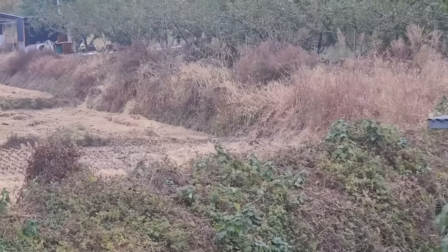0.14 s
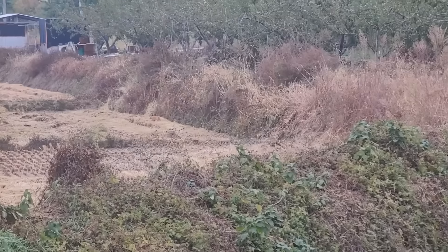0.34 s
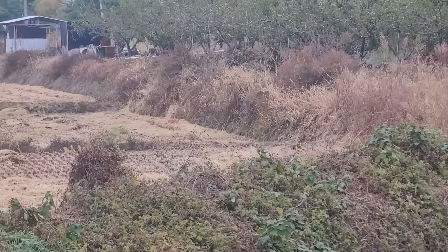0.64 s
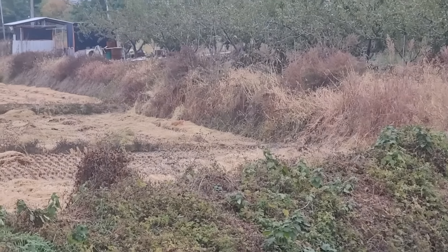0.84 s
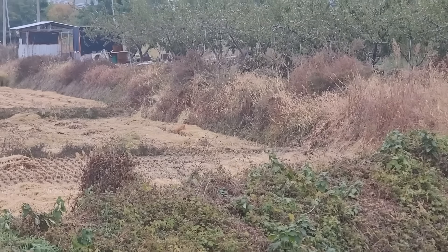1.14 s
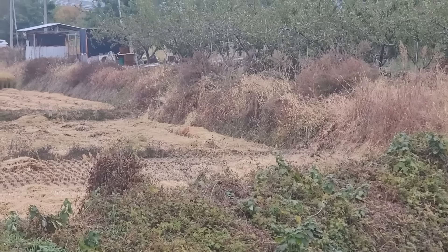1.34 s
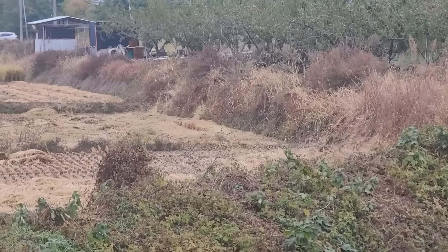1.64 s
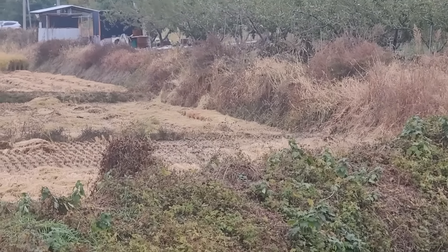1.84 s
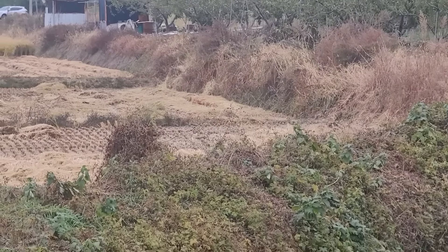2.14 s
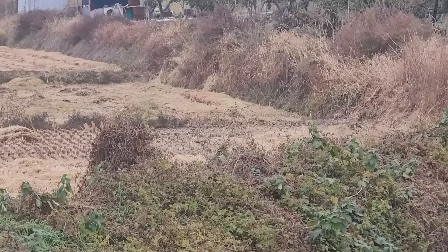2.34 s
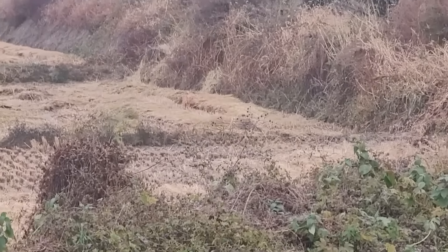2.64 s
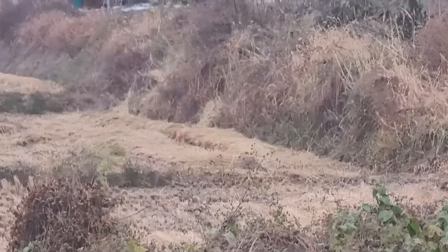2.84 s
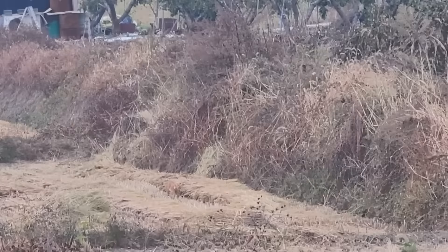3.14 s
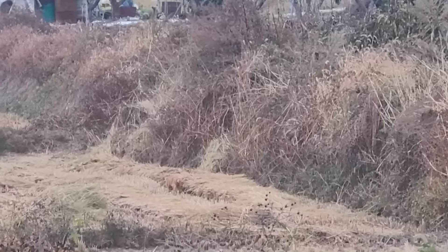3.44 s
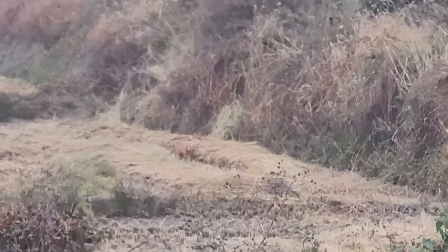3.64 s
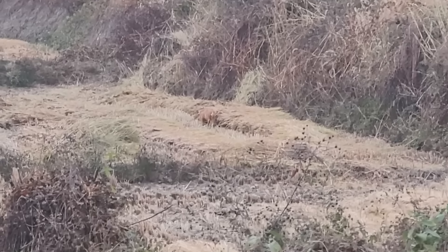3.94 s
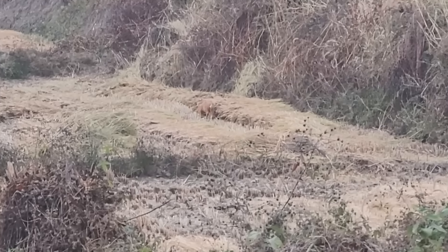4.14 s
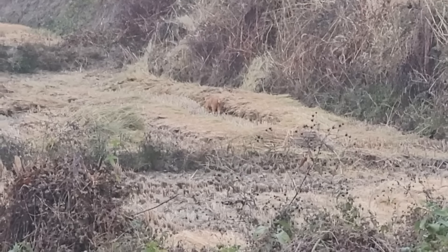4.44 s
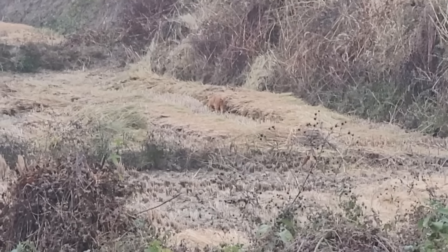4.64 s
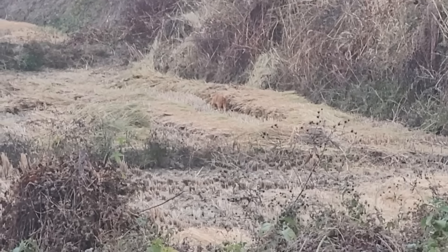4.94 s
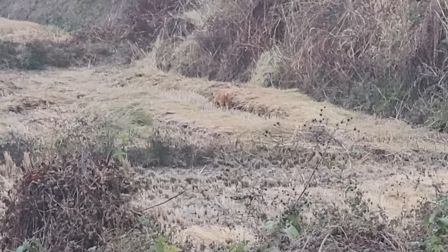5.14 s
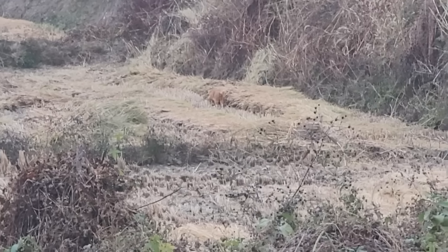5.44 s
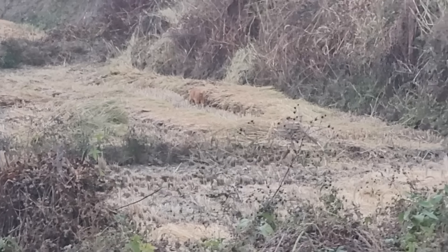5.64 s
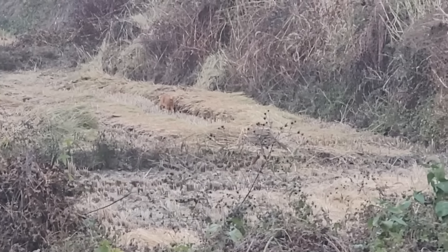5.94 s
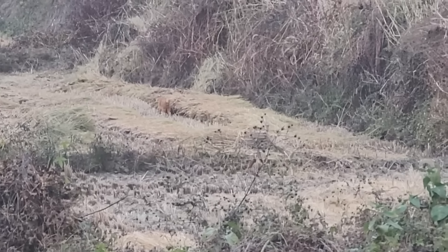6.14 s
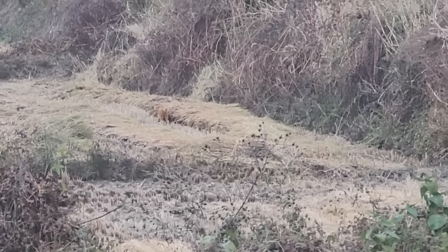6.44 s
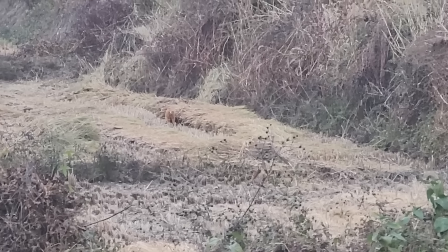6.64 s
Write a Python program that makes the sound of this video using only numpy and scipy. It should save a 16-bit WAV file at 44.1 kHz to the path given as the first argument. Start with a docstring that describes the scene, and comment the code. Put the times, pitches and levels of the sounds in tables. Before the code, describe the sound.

Quick, high dog yelps and hoarse barks repeat over a dry field, with sharp bird chirps, two dry rattles and rumbling wind.

```python
"""Across open farmland a small dog yelps in quick broken runs, then tires into single barks.
Small birds chirp, another scolds with two dry rattles, crickets trill, engines drone and wind rumbles.
Dog and birds are gliding oscillators with noise where the voice roughens; the rattles are damped resonances.
Crickets, engines and machines are wavering tones; air and handling ticks are shaped noise."""
import sys
import numpy as np
from scipy import signal
from scipy.fft import rfft, irfft, next_fast_len
from scipy.io import wavfile
from scipy.ndimage import uniform_filter1d, map_coordinates

SR = 44100
rng = np.random.default_rng(int(sys.argv[2]) if len(sys.argv) > 2 else 0)


def log_audio(samples):
    """Write samples as a 16-bit WAV file to the path given in sys.argv[1]."""
    # one column per channel
    frames = np.atleast_2d(samples).T
    # limit to full scale, then quantise
    limited = np.clip(frames, -1, 1)
    pcm = np.round(limited * 32767).astype(np.int16)
    wavfile.write(sys.argv[1], SR, pcm)


N = 298998


def amp(db):
    """Decibels to gain: 20 dB is a tenfold amplitude."""
    return 10 ** (np.asarray(db) / 20)


def unit(x):
    """Normalisation by effective value: x scaled to rms 1."""
    return x / np.sqrt(np.mean(x ** 2) + 1e-20)


def clock():
    """Sampled time: the time of every sample in seconds."""
    return np.arange(N) / SR


def along(points, hz):
    """Interpolation of (Hz, value) points on a logarithmic frequency axis."""
    point_hz, value = np.transpose(points)
    return np.interp(np.log(hz + 1), np.log(point_hz + 1), value)


def curves(rows):
    """Linear interpolation in time: one value per sample for each column after the time."""
    time_s, *columns = np.transpose(rows)
    return [np.interp(clock(), time_s, column) for column in columns]


def wobble(rate):
    """Band-limited fluctuation: a smooth curve through random knots, rate of them a second."""
    knots = rng.standard_normal(int(N * rate / SR) + 4)
    return map_coordinates(knots, [clock() * rate])


def gate(t, start, end, rise, fall):
    """Amplitude envelope: quarter-sine edges open at start and close at end."""
    opening = np.sin(np.pi / 2 * np.clip((t - start) / rise, 0, 1))
    closing = np.sin(np.pi / 2 * np.clip((end - t) / fall, 0, 1))
    return opening * closing


def swells(rows):
    """Superposition of bell-shaped gains, each row (time_s, level_db, half_length_s)."""
    return sum(amp(db) * np.exp(-.5 * ((clock() - s) / half) ** 2) for s, db, half in rows)


def filtered(x, response):
    """Linear filtering: the spectrum of x times a response of frequency, real or complex."""
    size = next_fast_len(N + SR // 2)
    return irfft(rfft(x, size) * response(np.fft.rfftfreq(size, 1 / SR)), size)[..., :N]


def syllables():
    """Vocal-fold tension sets pitch: barks climb in an S, yelps and whines glide along an arch."""
    # Rising barks: start_s, end_s, fundamental_db, overtones_db, first_hz, last_hz, roughness (0-1)
    barks = [(.072, 0.138, -36.5, -43, 334.4, 611, 0.57), (.433, 0.488, -38, -42, 443.4, 529, 0.48),
             (0.833, .894, -39.5, -41.5, 433.5, 560, 0.76), (1.253, 1.307, -36, -38.5, 472, 556, 0.65),
             (1.704, 1.773, -32, -40.5, 516.5, 595, 0.17), (2.102, 2.177, -36.5, -42, 419, 594, 0.7),
             (2.232, 2.28, -34, -55, 495, 626, 1), (2.348, 2.412, -38.5, -42, 341.3, 553, 0.61),
             (2.607, 2.676, -31, -39.5, 516, 611, 0.34), (3.026, 3.091, -32, -40.5, 460, 633, 0.48),
             (3.377, 3.441, -34, -41, 421.3, 584, 0.34), (3.778, 3.833, -31, -40, 512.5, 585, 0.41),
             (4.144, 4.211, -38.5, -40.5, 346, 560, 0.4), (4.508, 4.559, -37, -45, 367, 584, 0.3),
             (4.853, 4.899, -43.5, -47.5, 383, 554, .5), (5.157, 5.217, -40.5, -46, 309.5, 528, 0.33),
             (5.405, 5.468, -39.5, -41.5, 442.6, 512.4, 0.24), (5.725, 5.783, -40.5, -46, 292, 548, 0.24),
             (6.026, 6.08, -42, -48.5, 291.4, 578, 0.26), (6.316, 6.364, -43.5, -48, 299, 579, 0.2),
             (6.587, 6.65, -40, -45, 305, 531, 0.26)]
    # Clear open-mouthed yelps: start_s, end_s, fundamental_db, overtones_db, pitch_hz, glide_hz
    yelps = [(.494, 0.546, -36, -43.5, 568, 35), (.537, 0.634, -43.5, -52.5, 590, -92),
             (0.896, 0.949, -37, -42, 601, -72), (0.958, 1.009, -39.5, -41.5, 577, 63),
             (1.309, 1.359, -27.5, -41, 632, 73), (1.365, 1.411, -26, -42.5, 605, 33),
             (1.419, 1.476, -26, -44, 648.4, 28.5), (1.477, 1.52, -25, -41, 601, 75),
             (1.777, 1.837, -29, -42, 604.4, -14), (2.183, 2.233, -32, -39.5, 579, -46),
             (2.275, 2.35, -36.5, -46.5, 603, -96), (2.681, 2.752, -35, -41, 578, -53),
             (2.751, 2.81, -36, -42, 553, 83), (3.446, 3.503, -35.5, -52, 606, 5),
             (3.524, 3.593, -34, -47.5, 593, 134), (3.841, 3.881, -31, -46, 602, -9),
             (4.209, 4.308, -44, -51.5, 540.4, -46)]
    # Whines that trail off as the mouth closes: start_s, end_s, fundamental_db, pitch_hz, glide_hz
    whines = [(0.142, .196, -44, 692, 50), (1.514, 1.555, -32.5, 684, 67), (1.822, 1.876, -34, 686, 50),
              (3.087, 3.146, -37, 650, -62), (3.493, 3.528, -33.5, 644, -74),
              (3.873, 3.947, -36, 607.5, 32), (4.553, 4.616, -41.5, 682, 2), (4.891, 4.951, -44.5, 736, 75),
              (5.212, 5.245, -52, 630, 66), (5.469, 5.522, -47, 650, 47), (5.773, 5.823, -45, 663, -37),
              (6.071, 6.109, -48.5, 657, 0)]
    climb_centre, climb_width = .47, 0.1434  # shares of the bark's length
    arch_sag = 0.041  # share by which the pitch sinks at both ends
    yelp_rough, whine_rough = 0.18, 0.17  # 0-1
    u = np.linspace(0, 1, num=20)
    climb = 1 / (1 + np.exp((climb_centre - u) / climb_width))

    def arch(hz, glide):
        """Tension easing at both ends bends a straight glide into an arch."""
        return (hz + glide * (u - .5)) * (1 - arch_sag * (2 * u - 1) ** 2)

    for start, end, db, overtones_db, first, last, rough in barks:
        yield start, end, db, overtones_db, rough, first + (last - first) * climb
    for start, end, db, overtones_db, hz, glide in yelps:
        yield start, end, db, overtones_db, yelp_rough, arch(hz, glide)
    for start, end, db, hz, glide in whines:
        yield start, end, db, db - 17, whine_rough, arch(hz, glide)


def dog():
    """Source-filter voice: gliding harmonics take the throat's colour; rough noise pulses with the folds."""
    # Overtone colour of the throat, on top of a fall with harmonic order: frequency_hz, level_db
    throat = [(300, 21), (650, 2.5), (1050, 2.5), (1350, -13.5), (1600, 2), (1820, -0.5), (2000, -12.5),
              (2300, -63), (3500, -45)]
    # Relative spectrum of the rough noise: frequency_hz, density_db (per Hz)
    growl_colour = [(180, -25), (400, -16), (550, 3), (720, 3.5), (1050, -5.5), (1350, -13), (1750, -4.5),
                    (2100, -41), (3500, -41.5)]
    # Strength of the fundamental as pitch moves within a syllable: pitch_hz, relative_db
    mouth = [(320, 1), (420, -11), (600, -3)]
    onset_rough, onset_s = 1, 0.0039  # extra roughness while the folds start up, and its decay time
    out, now = np.zeros(N), clock()
    jitter, shimmer = wobble(260), wobble(110)
    growl = unit(filtered(rng.standard_normal(N), lambda hz: amp(along(growl_colour, hz))))
    orders = np.arange(2, 7)[:, None]
    for start, end, low_db, high_db, rough, pitches in syllables():
        on = (now >= start) & (now < end)
        t = now[on]
        scoop = 1 - 0.12 * np.exp(-(t - start) / 0.0029)  # the folds take a moment to reach their tension
        contour = np.interp(t, np.linspace(start, end, len(pitches)), pitches)
        hz = contour * scoop * (1 + 0.067 * rough * jitter[on])
        phase = 2 * np.pi * np.cumsum(hz) / SR
        strengths = amp(along(throat, orders * hz) - 3.4 * orders)
        overtones = unit(np.sum(strengths * np.sin(orders * phase), axis=0))
        fundamental = unit(amp(along(mouth, hz)) * np.sin(phase))
        voice = amp(low_db) * fundamental + amp(high_db + 1) * overtones
        roughness = 0.83 * rough + onset_rough * np.exp(-(t - start) / onset_s)
        fluttering = unit(growl[on] * (1 + 0.35 * np.cos(phase)))
        rasp = roughness * np.std(voice) * fluttering
        push = gate(t, start, end, rise=0.014 + 0.014 * rough, fall=0.016)  # rough barks build up more slowly
        out[on] += (voice + rasp) * unit(push * amp(1.8 * shimmer[on]))
    return amp(0.06) * out


def whistles():
    """Frequency modulation of a whistle: slurs hook up and sink, arches leap up, hold and drop."""
    # Down-slurred chirps: start_s, end_s, top_hz, bottom_hz, fall_s, closing_turn_hz, level_db,
    # hook_db (extra level on the opening hook)
    slurs = [(0.084, 0.151, 5870, 3040, 0.037, 0, -41, -1),
             (0.275, 0.393, 6600, 3520, 0.024, 334, -43.5, -8.5),
             (0.765, 0.882, 6200, 3855, 0.022, 230, -54.5, -12),
             (0.958, 1.04, 6300, 3440, 0.02, 2, -54, -20),
             (1.328, 1.423, 6600, 3500, 0.025, 343, -39.5, -3.5),
             (4.349, 4.423, 6440, 3020, 0.036, 8, -40, -7), (4.63, 4.697, 6510, 3010, 0.031, -5, -40, -7.5),
             (6.568, 6.613, 6550, 3580, 0.026, 3, -39.5, 1), (6.662, 6.772, 6020, 2860, 0.045, 0, -40, -20)]
    # Arched chirps: start_s, end_s, top_hz, glide_hz, level_db, legs_db (extra on rising and falling legs)
    arches = [(1.129, 1.244, 7200, -650, -42.5, -23), (1.731, 1.768, 6040, 695, -50, 2),
              (1.749, 1.788, 6480, 0, -48, -8), (4.202, 4.274, 7540, 0, -52.5, 15),
              (4.493, 4.57, 7720, 198, -59.5, 17), (6.38, 6.42, 7470, 0, -45.5, 13.5),
              (6.514, 6.544, 6400, 0, -38, -8)]
    hook_s, hook_rise_s, fall_shape = 0.0089, .014, 1.4  # time of the top, rise towards it, fall exponent
    turn_s, turn_width_s = .087, 0.01395  # time of the closing turn, and its half-length
    break_s, break_width_s = .029, 0.0035  # when the hook gives way to the slur, and how gradually
    hold_s, fade_db_per_s = 0.036, 152  # a slur holds its level, then fades
    arch_drop_hz, arch_rise_s, arch_fall_s = 2716, .0075, .004  # depth of an arch's feet, leg times
    for start, end, top, bottom, fall_s, turn_hz, db, hook_db in slurs:
        t = np.arange(0, end - start, 1 / SR)
        leg_s = np.where(t < hook_s, hook_rise_s, fall_s)
        height = np.exp(-np.abs((t - hook_s) / leg_s) ** fall_shape)
        turn = turn_hz * np.exp(-((t - turn_s) / turn_width_s) ** 2)
        shape_db = hook_db / (1 + np.exp((t - break_s) / break_width_s))
        fade_db = fade_db_per_s * np.maximum(t - hold_s, 0)
        yield start + t, bottom + (top - bottom) * height + turn, db + shape_db - fade_db
    for start, end, top, glide, db, legs_db in arches:
        t = np.arange(0, end - start, 1 / SR)
        feet = np.exp(-t / arch_rise_s) + np.exp((t - t[-1]) / arch_fall_s)
        hz = top + glide * (t / t[-1] - .5) - arch_drop_hz * feet
        yield start + t, hz, db + legs_db * feet


def chirps():
    """Near-sinusoidal whistling: thin tones quaver in pitch and level, with added husky bursts of noise."""
    # Where a bird's voice breaks into a rasp: time_s, level_db, half_length_s
    husks = [(.64, -63.5, 0.038), (1.748, -51.5, 0.0077), (6.378, -47.5, 0.0086), (6.53, -49, 0.015),
             (6.562, -48.5, 0.01)]
    # Relative spectrum of the rasp: frequency_hz, density_db (per Hz)
    husk_colour = [(2500, -26), (3900, -7.5), (4900, -11), (6000, -4), (7300, -7.5), (8600, -29.5)]
    out, now = np.zeros(N), clock()
    quaver, flutter = wobble(600), wobble(250)
    for s, hz, db in whistles():
        on = (now >= s[0]) & (now < s[-1])
        t = now[on]
        pitch = np.interp(t, s, hz) * (1 + 0.009 * quaver[on])
        phase = 2 * np.pi * np.cumsum(pitch) / SR
        envelope = gate(t, t[0], t[-1], rise=.004, fall=.004)
        level = amp(np.interp(t, s, db) + 2.4 * flutter[on]) * envelope
        out[on] += level * np.sin(phase)
    husk = unit(filtered(rng.standard_normal(N), lambda hz: amp(along(husk_colour, hz))))
    return amp(0.5) * out + swells(husks) * husk * amp(2.6 * flutter)


def rattle(levels, resonances, click_hz, scatter):
    """Damped resonance: each click rings the bird's throat at slightly new pitches and strengths."""
    cycles = np.cumsum(click_hz * (1 + 0.01777 * wobble(30))) / SR
    click = cycles.astype(int)
    since = cycles % 1 / click_hz  # seconds since the click
    ring = np.zeros(N)
    for hz, width, db in resonances:
        detune, strength = rng.standard_normal((SR, 2))[click].T
        strokes = np.exp(-width * since) * (1 - np.exp(-since / 0.0017))
        gain = amp(db + 1.7 * strength + 4.7 * wobble(900))  # the fast wobble makes the rasp
        ring += gain * strokes * np.sin(2 * np.pi * hz * (1 + scatter * detune) * since)
    ring = filtered(ring, lambda hz: 1 / (1 + (hz / 4100) ** 12))
    envelope = gate(clock(), levels[0][0], levels[-1][0], rise=0.029, fall=.015)
    return unit(ring) * amp(curves(levels)[0]) * envelope


def crickets():
    """Amplitude modulation by wing strokes pulses faint trills; random phase drift makes them fuzzy."""
    # Trills: start_s, end_s, pitch_hz, level_db
    trills = [(1.448, 1.748, 5700, -79), (2.377, 2.7, 6380, -78), (2.99, 4.151, 5910, -75),
              (3.68, 4.124, 6350, -73), (4.738, 5.3, 5890, -69.5), (5.186, 5.565, 6350, -71)]
    t = clock()
    strokes = amp(1.8 * wobble(25)) * (1 + .5 * np.sin(2 * np.pi * 55 * t))
    drift = 2 * np.pi * np.cumsum(50 * wobble(300)) / SR
    out = np.zeros(N)
    for start, end, hz, db in trills:
        envelope = gate(t, start, end, rise=0.075, fall=.06)
        out += amp(db) * envelope * np.sin(2 * np.pi * hz * t + drift)
    return strokes * out


def engines():
    """Periodic firing: only the lowest orders carry; a throbbing drone recedes while another speeds up."""
    # Firing rate of the throbbing engine: time_s, firing_hz
    revs = [(0, 74.5), (.85, 84), (1.25, 65.5), (2.3, 64), (3.3, 72.5), (4.2, 77), (4.55, 66), (5.1, 68),
            (5.5, 79.5), (6.78, 82)]
    # Loudness of the throbbing engine: time_s, level_db
    drone = [(0, -42), (.7, -47.5), (1.66, -40.5), (2.5, -40), (4.3, -47), (4.7, -50), (5.2, -63.5),
             (6.78, -62)]
    # Second engine: time_s, firing_hz, level_db
    second_engine = [(3.3, 119.5, -80), (3.6, 127.7, -52), (3.9, 139, -56.5), (4.5, 146.7, -60.5),
                     (5.4, 156.8, -64.5), (6.78, 168.5, -74)]
    beat_hz, beat_depth, trough_s = 2.27, 0.18, 2.783  # throb rate, depth (0-1), time of one trough
    phase = 2 * np.pi * np.cumsum(curves(revs)[0] * (1 + 0.0046 * wobble(12))) / SR
    throb = 1 - beat_depth * np.cos(2 * np.pi * beat_hz * (clock() - trough_s))
    firing = unit(np.sin(phase) + amp(-21) * np.sin(2 * phase))
    first = throb * amp(curves(drone)[0] + 2.9 * wobble(6.4)) * firing
    hz, db = curves(second_engine)
    second = amp(db + 2 * wobble(6)) * unit(np.sin(2 * np.pi * np.cumsum(hz) / SR))
    return first + second


def machines():
    """Propagation through moving air: far steady tones waver in pitch and level as they come and go."""
    # Machine tones: start_s, end_s, pitch_hz, level_db
    hums = [(-.3, 7.6, 120, -62), (-.3, 1.34, 385.3, -55), (1.4, 4.77, 382.7, -58.5),
            (3.25, 6.9, 385.1, -55), (2.25, 3.5, 312.4, -54.5), (5.3, 7, 308, -56),
            (5.7, 6.9, 269.2, -60.5)]
    out = np.zeros(N)
    for start, end, hz, db in hums:
        level = amp(db + 1.94 * wobble(11.0)) * gate(clock(), start, end, rise=0.07, fall=0.08)
        out += level * unit(np.sin(2 * np.pi * np.cumsum(hz + 2.52 * wobble(20)) / SR))
    return out


def rush(spectrum, alike, patchy_db):
    """Partly coherent noise: a stereo pair of rms 1, with random gain patches in time and frequency."""
    z = signal.stft(rng.standard_normal((2, N)), nperseg=512)[2]
    patches = uniform_filter1d(rng.standard_normal(z.shape[1:]), size=6, axis=0)
    patches = unit(uniform_filter1d(patches, size=14, axis=1))
    pair = signal.istft(z * amp(patchy_db * patches), nperseg=512)[1][:, :N]

    def mid_side(hz):
        """Coherence: the balance of mid and side sets the left-right likeness."""
        turn = np.arccos(np.clip(along(alike, hz), -1, 1)) / 2
        return amp(along(spectrum, hz)) * np.array([np.cos(turn), np.sin(turn)])

    mid, side = filtered(pair, mid_side)
    return unit(np.array([mid + side, mid - side]))


def air():
    """Broadband turbulence noise: low wind with buffets, a countryside wash and a fine, flickering hiss."""
    # Wind rumble: time_s, level_db
    wind_levels = [(0, -51), (2.8, -43.5), (3.5, -42), (4.5, -46.5), (5.3, -38.5), (5.7, -43),
                   (6.78, -38.5)]
    # Wind buffets on the microphone: time_s, level_db, half_length_s
    buffets = [(3.333, -32.5, 0.052), (4.739, -33.5, 0.019), (5.111, -25, 0.014), (5.42, -37, 0.035),
               (6.46, -38.5, 0.022)]
    # Relative spectra of wind, countryside and hiss: frequency_hz, density_db (per Hz)
    rumble = [(15, -14.5), (60, 1.5), (100, -7), (200, -40.5), (350, -65)]
    country_colour = [(100, -6.5), (200, -2.5), (520, -5.5), (900, -6), (1700, -12), (2200, -25.5),
                      (4500, -31), (6200, -28), (9000, -42)]
    hiss = [(2000, 5), (4000, -7), (6500, 2.5), (8500, -13), (12500, -1), (15500, -2)]
    # Left-right likeness of the wind, then of countryside and hiss: frequency_hz, likeness (0-1)
    wind_alike = [(30, 0.45), (100, 0.78)]
    alike = [(30, 1), (100, 0.81), (300, 0.97), (640, 0.39), (1400, 0.12), (3000, 0.025), (15000, 0)]
    # Course of the fine hiss, before an 8.5 dB lift: time_s, level_db
    fizz_levels = [(0, -74.5), (.8, -79.5), (1.18, -69.5), (1.28, -65), (1.41, -62.5), (1.46, -94),
                   (1.68, -70.5), (1.85, -75.5), (2.95, -72.5), (3.68, -65), (3.91, -72.5), (4.55, -65.5),
                   (4.8, -72.5), (6.1, -73), (6.78, -69)]
    flicker_hz, flicker_depth_db = 17, 2.5
    wind_gain = np.hypot(amp(curves(wind_levels)[0]), swells(buffets))  # powers add
    wind = wind_gain * rush(rumble, wind_alike, patchy_db=0.5)
    country = amp(-49.5) * rush(country_colour, alike, patchy_db=1.5)
    flicker_phase = 2 * np.pi * np.cumsum(flicker_hz * (1 + .25 * wobble(9))) / SR
    flicker_db = flicker_depth_db * np.sin(flicker_phase)
    fizz_gain = amp(curves(fizz_levels)[0] + 8.5 + flicker_db + 1.3 * wobble(700))
    fizz = fizz_gain * rush(hiss, alike, patchy_db=3.5)
    return wind + country + fizz


def ticks():
    """Impulsive contact: each handling tick is a band of noise that dies by 60 dB in 9 ms."""
    # Handling ticks: time_s, level_db, lowest_hz, highest_hz
    contacts = [(1.63, -49.5, 1007, 12100), (3.0167, -30.5, 60, 1190), (3.29, -37.5, 12200, 16100),
                (3.693, -43, 9000, 15900), (4.555, -46, 5000, 14900)]
    out, t = np.zeros(N), np.arange(SR // 50) / SR
    for s, db, low_hz, high_hz in contacts:
        edges = np.clip([low_hz, max(high_hz, 1.1 * low_hz)], 20, SR / 2 - 1)
        band = signal.butter(1, edges, "bandpass", fs=SR)
        burst = amp(db - 60 * t / 0.009) * rng.standard_normal(len(t))
        out[round(s * SR):][:len(t)] += signal.lfilter(*band, burst)
    return out


def outdoors(x, lead_ms, pan_db, scatter_db):
    """Interaural differences and scattering: the left leads by lead_ms; banks and bushes add a short tail."""
    # Decay of sound scattered by banks and bushes: frequency_hz, t60_s
    decay = [(300, 0.21), (1500, 0.18), (4000, 0.2), (8000, 0.28)]
    side = np.array([[.5], [-.5]])  # left, right
    direct = filtered(x, lambda hz: amp(side * pan_db) * np.exp(2j * np.pi * hz * side * lead_ms / 1000))
    hz, t, z = signal.stft(rng.standard_normal((2, SR // 2)), SR, nperseg=256)
    tail = signal.istft(z * amp(-60 * t / along(decay, hz)[:, None]), SR, nperseg=256)[1]
    tail = tail / np.linalg.norm(tail[0])
    return direct + amp(scatter_db) * signal.fftconvolve(x[None], tail, axes=1)[:, :N]


def scene():
    """Superposition: dog, birds and motors lead on the left, crickets and ticks are central, air surrounds."""
    # Courses of the two scolding rattles: time_s, level_db
    long_levels = [(.87, -61.5), (.94, -51), (1.1, -52.5), (1.25, -50.5), (1.39, -54), (1.44, -85)]
    short_levels = [(2.56, -66), (2.65, -57.5), (2.72, -57), (2.75, -81)]
    # Resonances that their clicks ring: frequency_hz, damping (decay rate per second), relative_db
    long_resonances = [(1609, 79, -0.5), (2373, 210, -1.5), (2840, 150, -1), (3343, 107, -2.5)]
    short_resonances = [(2930, 110, 1), (3150, 150, 12), (3370, 170, -8)]
    long_rattle = rattle(long_levels, long_resonances, click_hz=72.96, scatter=.05)
    short_rattle = rattle(short_levels, short_resonances, click_hz=66.0, scatter=0.013)
    yelping = outdoors(dog(), lead_ms=0.17, pan_db=0.2, scatter_db=-13.5)
    birds = outdoors(chirps(), lead_ms=0.5015, pan_db=-0.5, scatter_db=-3.5)
    scold = outdoors(long_rattle, lead_ms=0.15, pan_db=9.5, scatter_db=2.0)
    second_scold = outdoors(short_rattle, lead_ms=0.58, pan_db=12.0, scatter_db=-8)
    insects = outdoors(crickets(), lead_ms=0, pan_db=0, scatter_db=-1)
    motors = outdoors(engines() + machines(), lead_ms=0.22, pan_db=0.8, scatter_db=-42.0)
    return yelping + birds + scold + second_scold + insects + motors + air() + ticks()


def record(dry):
    """Band limiting: nothing at or above 15550 Hz passes."""
    return filtered(dry, lambda hz: hz < 15550)


dry = scene()
out = record(dry)
log_audio(out)
```